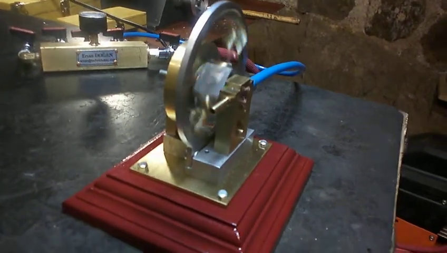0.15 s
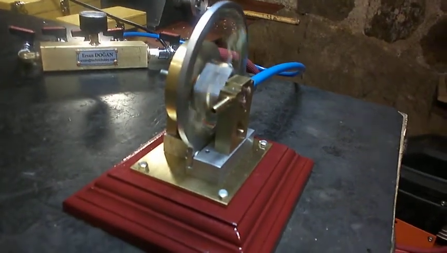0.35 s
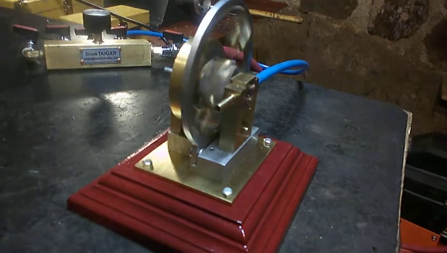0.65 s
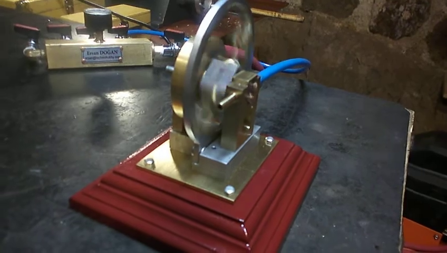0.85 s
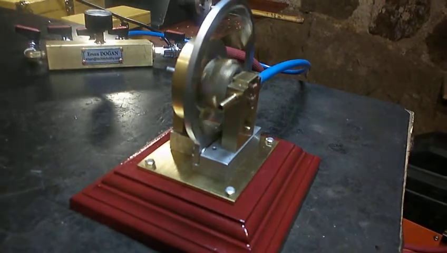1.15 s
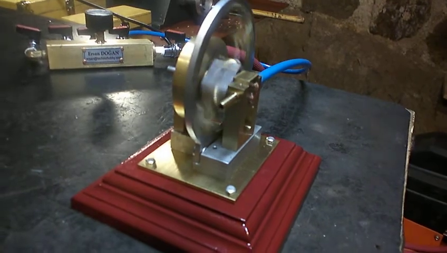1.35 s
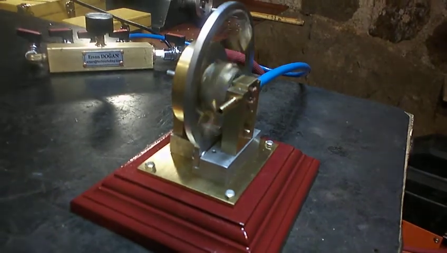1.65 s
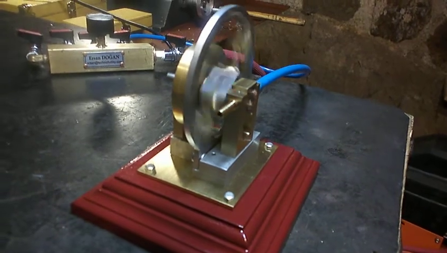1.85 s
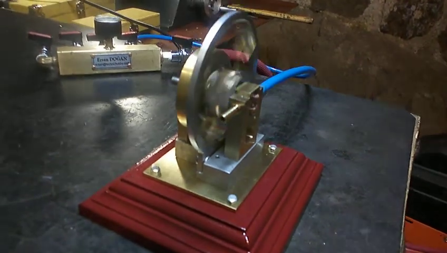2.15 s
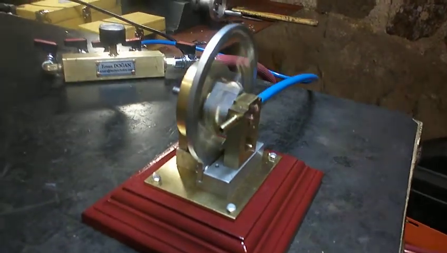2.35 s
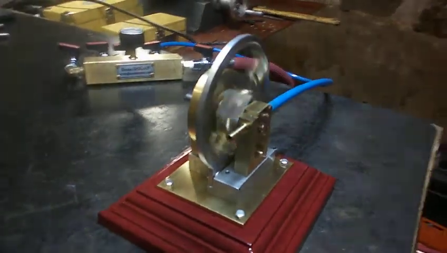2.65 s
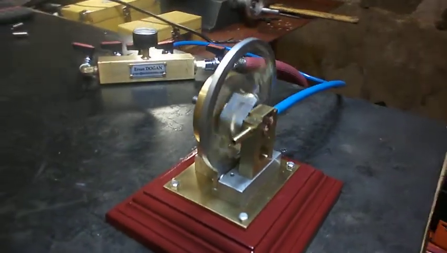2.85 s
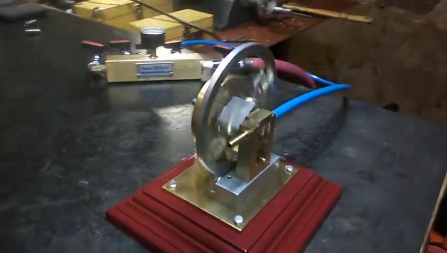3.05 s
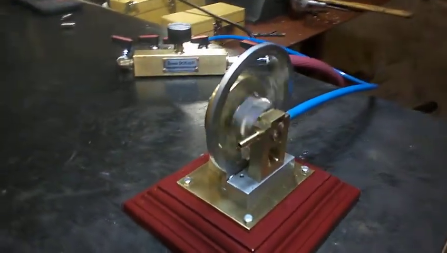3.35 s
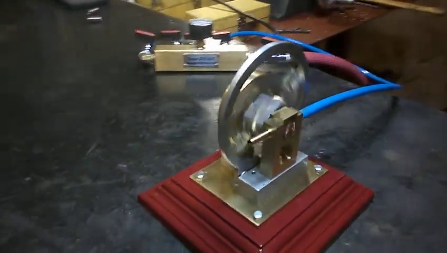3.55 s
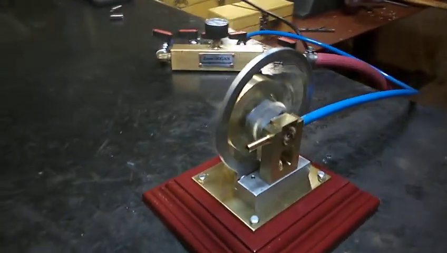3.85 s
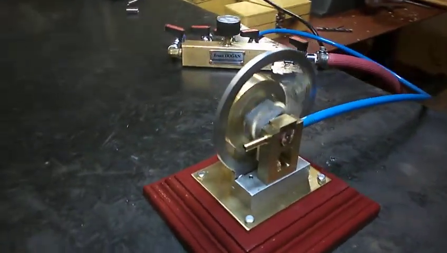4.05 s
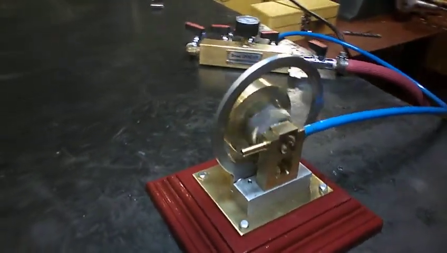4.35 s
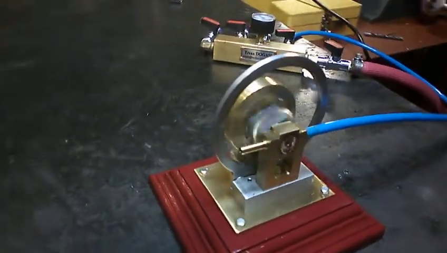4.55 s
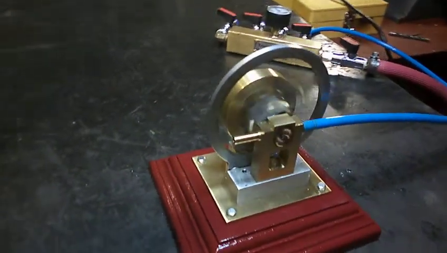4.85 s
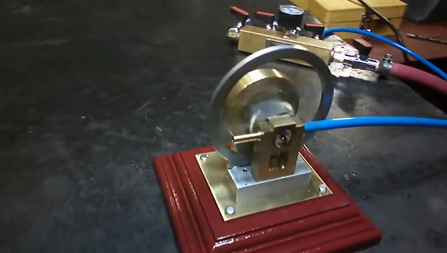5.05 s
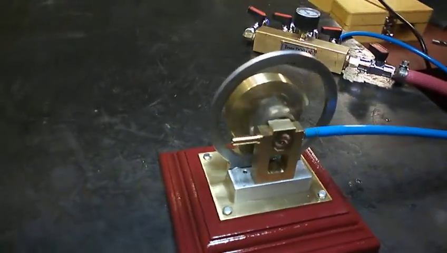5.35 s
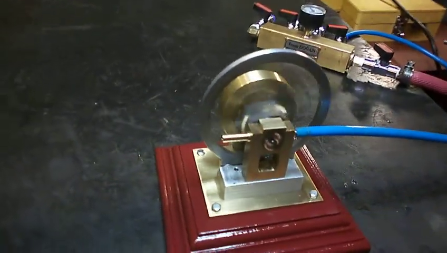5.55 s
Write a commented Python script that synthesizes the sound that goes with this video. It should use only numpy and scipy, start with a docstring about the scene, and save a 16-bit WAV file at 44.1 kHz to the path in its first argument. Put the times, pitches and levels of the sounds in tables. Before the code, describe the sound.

Steady fast clatter from a model engine, close up. Each turn has one dominant chattering metal knock, a brief burst of air, smaller bearing taps, and a woody thud about three quarters through. Airy hiss opens and closes with the rhythm. The speed barely wavers, sagging very slightly near the end. The microphone walks round it, changing brightness and balance; short dense room reflections and faint room tone lie behind, with dull treble.

```python
"""On a workshop bench, a model oscillating-cylinder engine runs on compressed air at about eight turns a second.
Each turn brings a hard clack from the linkage, bearing ticks and dull thuds, all blows that ring damped modes.
The exhaust port puffs and air leaks past the port face: coloured noise opened and shut by the crank angle.
A handheld microphone walks round it, close by, shifting the balance as it faces each part."""
import sys
import numpy as np
from scipy import signal
from scipy.fft import rfft, irfft
from scipy.io import wavfile
from scipy.ndimage import uniform_filter1d

SR = 44100
rng = np.random.default_rng(int(sys.argv[2]) if len(sys.argv) > 2 else 0)


def log_audio(samples):
    """Write samples as a 16-bit WAV file to the path given in sys.argv[1]."""
    # one column per channel
    frames = np.atleast_2d(samples).T
    # limit to full scale, then quantise
    limited = np.clip(frames, -1, 1)
    pcm = np.round(limited * 32767).astype(np.int16)
    wavfile.write(sys.argv[1], SR, pcm)


N = 251811

# Every level, force and hardness below is a starting balance, ahead of the beams, room and recorder.
# flywheel speed, wandering with the air supply: [time_s, speed_turns_per_s]
FLYWHEEL_SPEED = [(0, 7.978), (.6, 7.955), (1.4, 8.012), (1.75, 7.999), (2.1, 8.073), (2.65, 8.061),
                  (2.95, 7.954), (3.25, 8.034), (4.1, 7.914), (5.2, 7.962), (5.45, 7.776), (5.7, 7.818)]
# chatter and rebounds of the crank pin in each knock: [delay_s, force_db, hardness_db, scatter_s]
PIN_CONTACTS = [(.0003, 2, -4, 0), (.0012, -18, 15, .00013), (.0021, -15, 10.5, .00013),
                (.0037, -7, -7, .0001), (.005, -13, 0, .00015), (.0089, -20, 2, .0002)]
# modes of the frame under the main knock: [pitch_hz, width_hz, level_db]
FRAME_MODES = [(265, 72, -3), (338, 90, 2), (745, 79, 3.5), (1231, 188, 0.5), (1604, 331, 15.5),
               (2266, 367, 18), (2434, 384, 8), (3222, 205, 12), (3348, 162, 12.5), (4486, 240, 13),
               (5150, 150, 12), (6130, 540, 1), (6980, 750, -1)]
# flywheel modes that sing faintly after each knock: [pitch_hz, width_hz, level_db]
FLYWHEEL_MODES = [(5240, 24, 13), (6880, 32, 6)]
# puffs from the exhaust port, counted from the knock: [start_turns, open_turns, level_db]
EXHAUST_OPENINGS = [(0.957, 0.05, -35.5), (0.0042, 0.11, -30.5), (0.12, 0.13, -32), (0.621, .16, -39.5)]
# spectrum of the exhaust jet: [pitch_hz, level_db]
EXHAUST_SPECTRUM = [(100, -30), (300, -24), (1000, -22), (1700, -8), (2300, -10), (2900, -13), (3450, -2),
                    (4150, 1), (5000, -7), (5800, -15), (6400, -13), (6900, -10), (7500, -12)]
# escapes where the rocking port face lifts: [start_turns, open_turns, level_db]
LEAK_OPENINGS = [(.237, 0.044, -37), (0.304, 0.016, -32), (0.447, 0.37, -35), (.74, 0.047, -37),
                 (.922, 0.097, -34), (.03, 0.16, -41)]
# spectrum of the leaking air: [pitch_hz, level_db]
LEAK_SPECTRUM = [(100, -30), (400, -19), (1000, -12), (1600, -7), (2200, -5), (2550, -10), (3100, -5),
                 (3500, 0), (4300, -4), (5000, -5), (5800, -7), (6800, -3), (7500, -4.5)]
# crank angles where bearing play is taken up: [start_turns, force_db, hardness_db, scatter_s]
BEARING_TICKS = [(.232, 0, -3, .0002), (.252, -4, 2, .0003), (.305, -11, 9, .0003), (.456, -6, -3, .0004),
                 (.467, -9, 3, .0004), (.496, -9, 8, .0004), (.567, -8, -9, .0005), (.707, -8, -8, .0008),
                 (.736, 0, 0, .0004), (.75, -6, 6, .0006), (.803, -3, -1, .0005), (.816, -3, -6, .0005),
                 (.87, -15, 7, .0006), (.915, -7, -5, .0008)]
# modes of the crank, rod and cylinder pivot: [pitch_hz, width_hz, level_db]
LINKAGE_MODES = [(390, 220, -11), (1241, 158, 3.5), (1584, 47, 11.5), (1814, 87, 12), (2252, 60, 10),
                 (2514, 89, 4.5), (3425, 280, 1.5), (4170, 110, -11.5), (4590, 266, 4), (5202, 71, 8.5),
                 (5470, 89, 5), (6180, 380, -1), (6796, 97, 1.5)]
# modes of the hollow wooden base: [pitch_hz, width_hz, level_db]
BASE_MODES = [(500, 37, -7), (728, 116, 7.5), (800, 37.7, 17.5)]
# crank angles where the piston shoves the engine against the bench: [start_turns, force_db]
PISTON_SHOVES = [(0.243, -0.5), (0.353, -6), (0.451, -4), (0.73, -5.5), (0.926, -7.5)]
# modes of the bench top: [pitch_hz, width_hz, level_db]
BENCH_MODES = [(203, 93, -5.5), (350, 240, 3), (480, 580, 1)]
# walk of the microphone, as an angle from the flywheel's plane: [time_s, angle_degrees]
MIC_WALK = [(0, 21), (1.6, 16.4), (2.3, 34), (3.0, 38), (3.7, 44), (4.4, 66), (5.0, 71.5), (5.7, 85)]
# beam of each sound, by name: [axis_degrees, axis_level_db, right_angle_loss_db]
SOUND_BEAMS = {"exhaust": (16, 2.9, 4), "leak": (35, 4.65, 1.8), "ticks": (25, -2.3, 0.45),
               "base": (7.9, -1.6, 4.5), "knock": (5.3, 0.46, 1.8), "hardness": (54, 2.5, 7.9),
               "frame": (107.6, 9, 13), "cylinder": (98, 2.7, 4.6), "flywheel": (52, 3.45, 12)}
# spectrum of the quiet workshop: [pitch_hz, level_db]
ROOM_SPECTRUM = [(25, -23.5), (50, -8.5), (80, -9), (150, -4.5), (300, -2), (700, -0.5), (2000, -6),
                 (8000, -22)]


def knock():
    """The load reverses: the crank pin slams across its play, chatters and sets the flywheel ringing."""
    times = crank_times(0)
    force_db = beam_db("knock", times)
    hardness_scatter_db = 0.33
    hardness_db = beam_db("hardness", times) + hardness_scatter_db * rng.standard_normal(len(times))
    contacts = []
    for delay_s, contact_db, contact_hardness_db, scatter_s in PIN_CONTACTS:
        contact_times = times + delay_s + scatter_s * rng.standard_normal(len(times))
        contacts.append([contact_times, force_db + contact_db, hardness_db + contact_hardness_db])
    clack = strike(FRAME_MODES, *np.hstack(contacts), low_scrape=0.17, high_scrape=0.48, scrape_s=0.0027)
    flywheel = ring(blows(times, force_db, scrape=0.58, scrape_s=0.0017), FLYWHEEL_MODES)
    return clack + flywheel


def exhaust(turn):
    """Spent air bursts through the exhaust port as turbulent noise."""
    return jet(turn, EXHAUST_OPENINGS, attack_turns=0.022, release_turns=0.06, shut_db=-55.5,
               spectrum=EXHAUST_SPECTRUM, flutter_db=1.05)


def leak(turn):
    """Air hisses through the gap where the rocking port face lifts."""
    return jet(turn, LEAK_OPENINGS, attack_turns=0.013, release_turns=0.038, shut_db=-62,
               spectrum=LEAK_SPECTRUM, flutter_db=2.5)


def ticks():
    """Loose bearings tap the linkage, with timing and force scattered from turn to turn."""
    taps = []
    for start_turns, force_db, hardness_db, scatter_s in BEARING_TICKS:
        times = crank_times(start_turns)
        tap_times = times + scatter_s * rng.standard_normal(len(times))
        tap_db = force_db + rng.standard_normal(len(times))
        taps.append([tap_times, tap_db, np.full(len(times), hardness_db)])
    return strike(LINKAGE_MODES, *np.hstack(taps), low_scrape=0.33, high_scrape=1.0, scrape_s=0.0025)


def thump():
    """The end of the power stroke pushes a hollow note from the base, and a near wall throws it back."""
    times = crank_times(.738)
    force_db = 0.29 * rng.standard_normal(len(times))
    push = blows(times, force_db, scrape=0.12, scrape_s=0.0037)
    echo_delay_s, echo_db = 0.01318, -8.5
    echo = blows(times + echo_delay_s, force_db + echo_db, scrape=.15, scrape_s=0.0037)
    return ring(push + echo, BASE_MODES)


def shoves():
    """The rocking engine pushes dull thuds out of the bench top."""
    force = 0
    for start_turns, force_db in PISTON_SHOVES:
        times = crank_times(start_turns)
        force = force + blows(times, np.full(len(times), force_db), scrape=0.17, scrape_s=0.011)
    return ring(force, BENCH_MODES)


def workshop(x, t60_s, wet_db):
    """Bench and stone walls return a short, dense tail: noise that swells in and decays exponentially."""
    t = np.arange(SR // 2) / SR
    decay = np.exp(-np.log(1000) * t / t60_s)
    swell_s = 0.0078
    tail = rng.standard_normal(len(t)) * decay * np.clip(t / swell_s, 0, 1) ** 2
    return x + undb(wet_db) * signal.fftconvolve(x, tail / np.linalg.norm(tail))[:N]


def room_tone():
    """The quiet workshop is a steady bed of coloured noise."""
    return undb(-54.0) * hiss(ROOM_SPECTRUM)


def crank():
    """Integrate flywheel speed into turns since the first knock, on a clock that overlaps both ends."""
    clock = np.arange(-SR // 4, N + SR // 4) / SR
    turns = np.cumsum(np.interp(clock, *np.transpose(FLYWHEEL_SPEED))) / SR
    first_knock_s = .10565
    return clock, turns - np.interp(first_knock_s, clock, turns)


def crank_times(share):
    """The moments at which the crank passes a given share of each turn."""
    clock, turns = crank()
    whole_turns = np.arange(np.ceil(turns[0]), np.floor(turns[-1]))
    return np.interp(whole_turns + share, turns, clock)


def strike(modes, times, force_db, hardness_db, low_scrape, high_scrape, scrape_s):
    """Blows on a body; harder contact feeds its upper modes more."""
    split_hz = 2900
    low_modes = [mode for mode in modes if mode[0] < split_hz]
    high_modes = [mode for mode in modes if mode[0] >= split_hz]
    low = ring(blows(times, force_db, low_scrape, scrape_s), low_modes)
    high = ring(blows(times, force_db + hardness_db, high_scrape, scrape_s), high_modes)
    return low + high


def blows(times, force_db, scrape, scrape_s):
    """Contact force: a sharp impact, then a brief noisy scrape as the faces settle."""
    t = np.arange(SR // 50) / SR
    # scaled so that scrape is its size beside the impact, whatever its length
    fade = np.exp(-t / scrape_s) / np.sqrt(scrape_s * SR / 2)
    shapes = scrape * rng.standard_normal((len(times), len(t))) * fade
    shapes[:, 0] += 1
    index = np.round(times * SR).astype(int)[:, None] + np.arange(len(t))
    inside = (index >= 0) & (index < N)
    return np.bincount(index[inside], (shapes * undb(force_db)[:, None])[inside], N)


def ring(force, modes):
    """Drive a body's damped modes; neighbours swing in opposite senses, and a small body radiates little bass."""
    t = np.arange(SR // 10) / SR
    response = 0
    for k, (pitch_hz, width_hz, level_db) in enumerate(modes):
        strength = (-1) ** k * undb(level_db) * 2 * np.pi * width_hz / SR
        # a wider mode dies away faster
        response = response + strength * np.exp(-np.pi * width_hz * t) * np.sin(2 * np.pi * pitch_hz * t)
    bass_hz = 130
    response = signal.sosfilt(signal.butter(2, bass_hz, "high", fs=SR, output="sos"), response)
    return signal.fftconvolve(force, response)[:N]


def jet(turn, puffs, attack_turns, release_turns, shut_db, spectrum, flutter_db):
    """Turbulent air through a port: each puff rises as it opens, holds, and dies away once it shuts."""
    power = undb(shut_db) ** 2
    for start_turns, open_turns, level_db in puffs:
        age = (turn - start_turns) % 1
        rise = np.minimum(age / attack_turns, 1)
        fall = np.exp(-np.maximum(age - open_turns, 0) / release_turns)
        power = power + (undb(level_db) * rise * fall) ** 2
    flutter = uniform_filter1d(rng.standard_normal(N), size=130)
    return hiss(spectrum) * np.sqrt(power) * undb(flutter_db * flutter / flutter.std())


def hiss(spectrum):
    """Noise of rms 1, coloured by a spectrum joined up on a log-frequency scale."""
    pitch_hz, level_db = np.transpose(spectrum)
    bins_hz = np.maximum(np.fft.rfftfreq(N, 1 / SR), 1)
    gain = undb(np.interp(np.log(bins_hz), np.log(pitch_hz), level_db))
    x = irfft(rfft(rng.standard_normal(N)) * gain, N)
    return x / x.std()


def beam_db(name, times):
    """A beamed sound weakens as the microphone moves off its axis."""
    axis_degrees, axis_level_db, loss_db = SOUND_BEAMS[name]
    off_axis = np.radians(np.interp(times, *np.transpose(MIC_WALK)) - axis_degrees)
    return axis_level_db - loss_db * np.sin(off_axis) ** 2


def face(x, gain, pitch_hz, width_hz):
    """One resonance is beamed more or less towards the microphone."""
    band = signal.lfilter(*signal.iirpeak(pitch_hz, pitch_hz / width_hz, fs=SR), x)
    return x + (gain - 1) * band


def undb(db):
    """Decibels to amplitude gain."""
    return 10 ** (np.asarray(db) / 20)


def scene():
    """The crank angle times every puff and tap; the microphone's bearing sets their balance."""
    t = np.arange(N) / SR
    turn = np.interp(t, *crank())
    beam = {name: undb(beam_db(name, t)) for name in SOUND_BEAMS}
    engine = face(knock(), beam["frame"], pitch_hz=2680, width_hz=320)
    engine = engine + beam["exhaust"] * exhaust(turn) + beam["leak"] * leak(turn)
    engine = engine + beam["ticks"] * ticks() + beam["base"] * (thump() + shoves())
    engine = face(engine, beam["cylinder"], pitch_hz=3200, width_hz=750)
    engine = face(engine, beam["flywheel"], pitch_hz=5300, width_hz=350)
    return (workshop(engine, t60_s=0.39, wet_db=-16.0) + room_tone())[None]


def record(dry):
    """A narrow-band recorder drops deep bass, cuts the top and faintly mirrors it about half its sample rate."""
    low_hz, top_hz, mirror_top_hz, recorder_hz = 70, 7380, 8500, 16000
    x = signal.sosfilt(signal.butter(2, low_hz, "high", fs=SR, output="sos"), dry)
    x = signal.sosfiltfilt(signal.ellip(6, .15, 50, top_hz, fs=SR, output="sos"), x)
    # multiplying by a tone at the recorder's rate folds the spectrum over; each image is 23 dB down
    x = x * (1 + 2 * undb(-23) * np.cos(2 * np.pi * recorder_hz * np.arange(N) / SR))
    return signal.sosfiltfilt(signal.ellip(6, .15, 50, mirror_top_hz, fs=SR, output="sos"), x)


dry = scene()
out = record(dry)
log_audio(out)
```